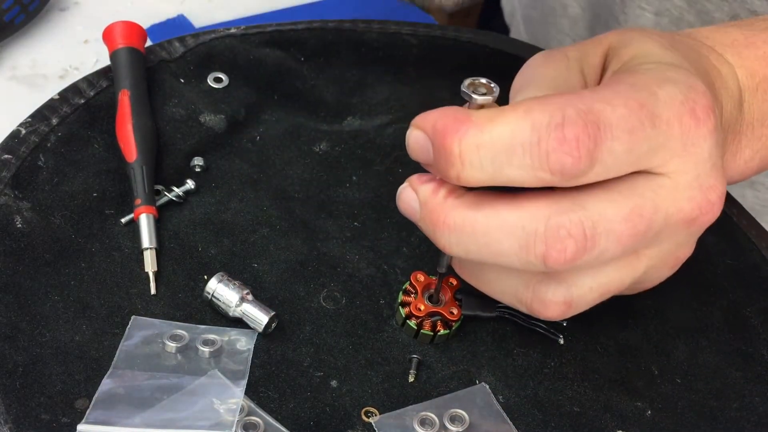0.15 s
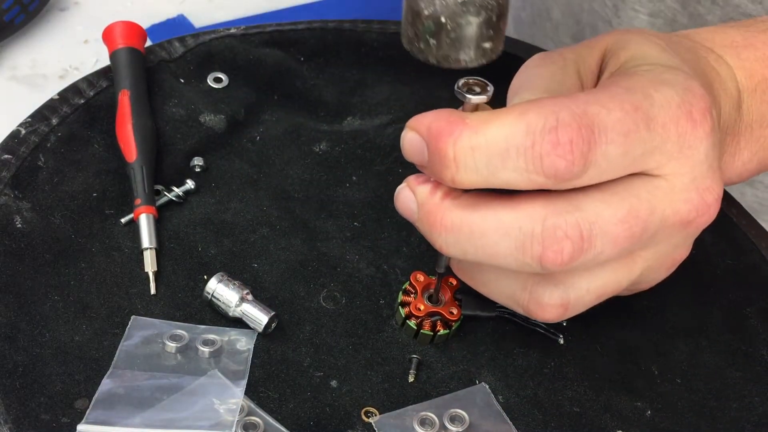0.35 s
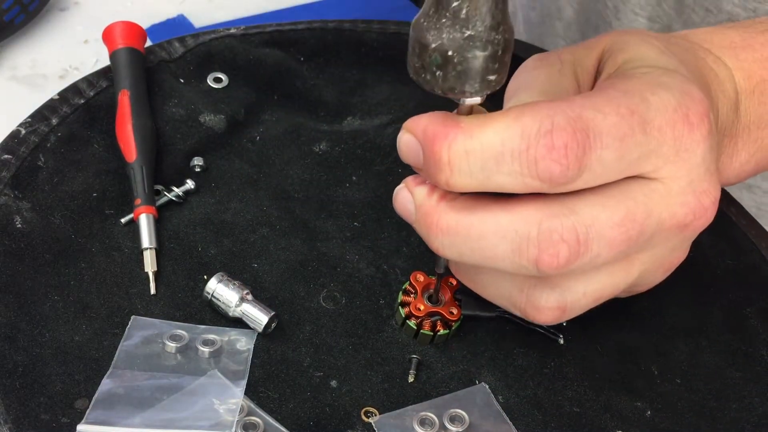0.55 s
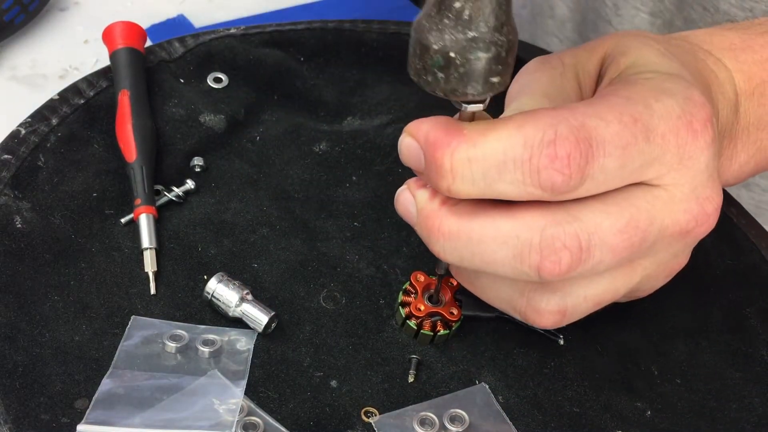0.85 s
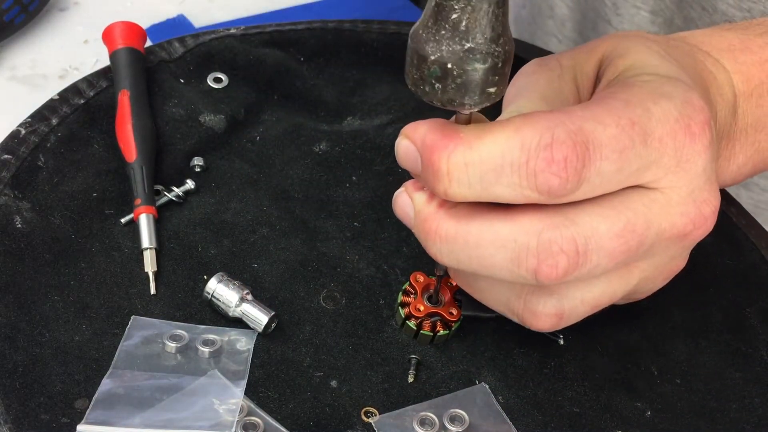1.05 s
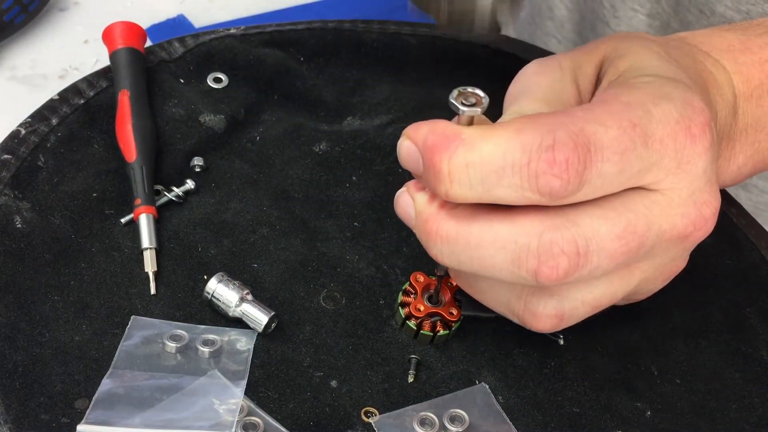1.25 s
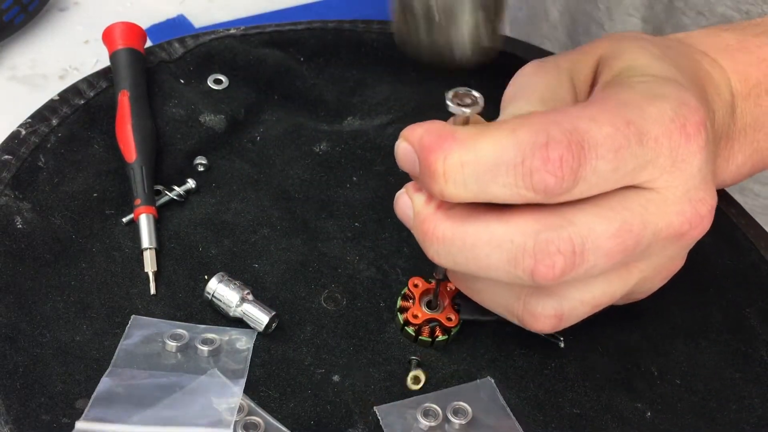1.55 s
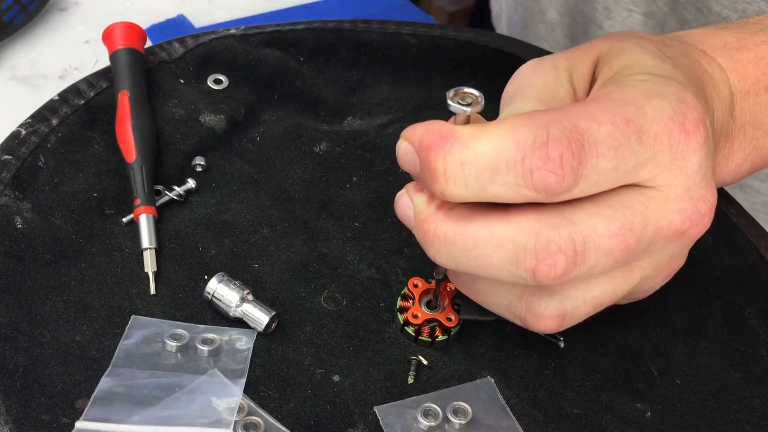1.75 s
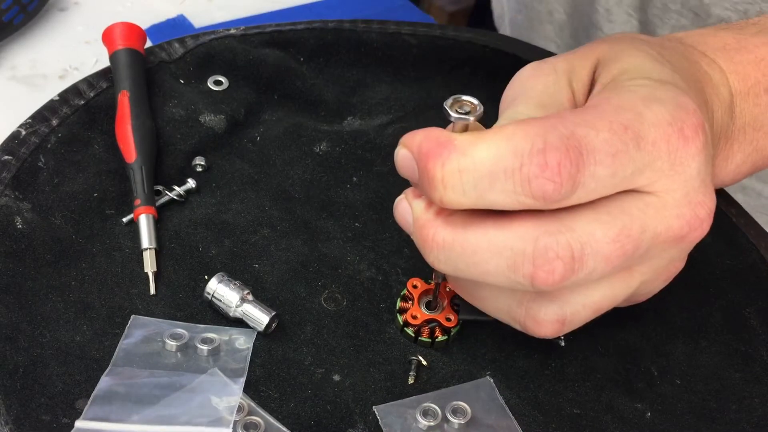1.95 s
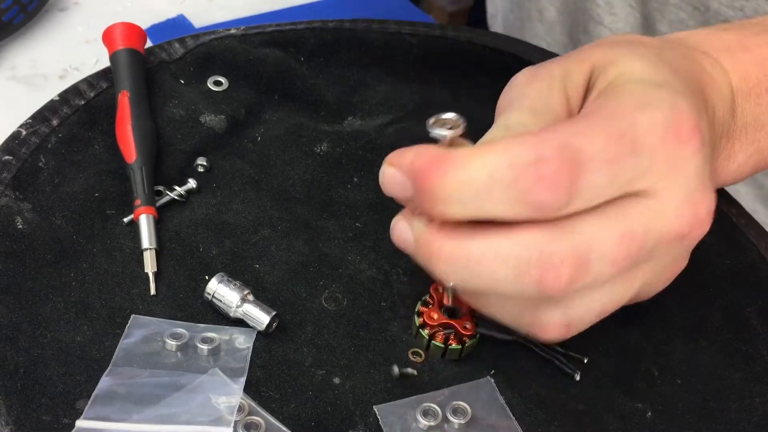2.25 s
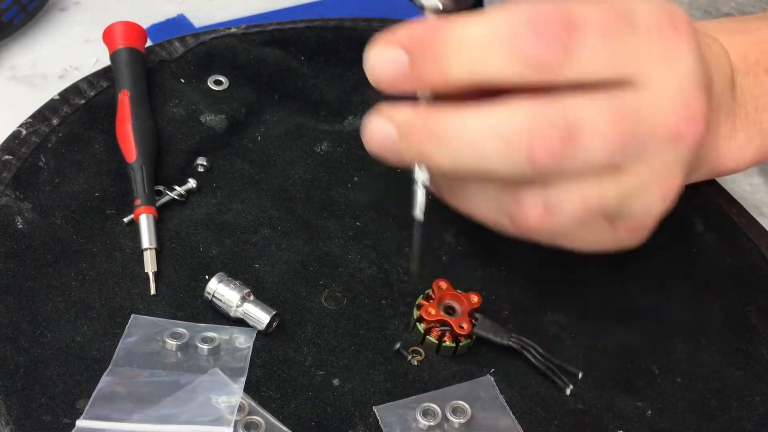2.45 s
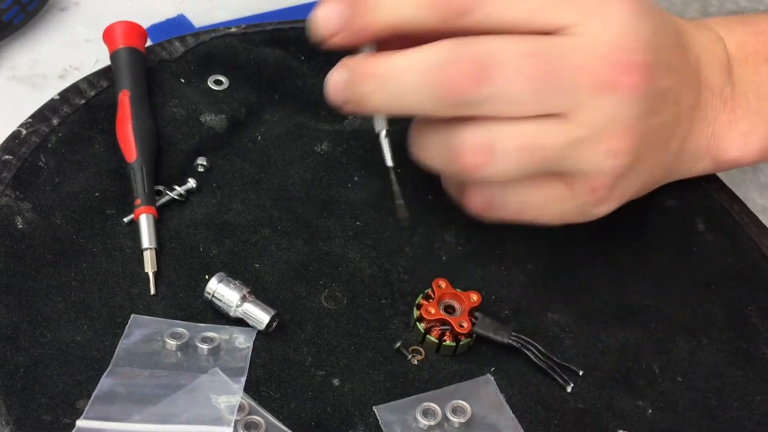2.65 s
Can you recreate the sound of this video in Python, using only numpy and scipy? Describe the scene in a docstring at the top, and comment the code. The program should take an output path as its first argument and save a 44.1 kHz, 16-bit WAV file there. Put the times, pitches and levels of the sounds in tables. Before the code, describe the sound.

Close, slightly clipped hammering on metal in a small workshop: quiet ticks first, three sharp loud hits at short even intervals, slight shuffling and washer tinkles, then the hammer set down with softer knocks over low hum.

```python
"""A hammer taps, then strikes a small screwdriver held on a motor bearing on a thin bench, and is set down.
Each contact sums a steel crack of short high modes, bench modes spread by a bending wave (treble first),
a rattle of dense jolts and the ringing hammer head, with a small room behind all but the ring.
Small metal ticks lie around the blows; a dull rubbing and washer jingles follow the last one.
Filtered-noise air and an appliance hum lie underneath; the recorder ducks and clips.
The hammer being set down makes softer contacts that have no crack."""
import sys
import numpy as np
from scipy import signal
from scipy.fft import rfft, irfft
from scipy.io import wavfile
from scipy.ndimage import uniform_filter1d

SR = 44100
rng = np.random.default_rng(int(sys.argv[2]) if len(sys.argv) > 2 else 0)


def pcm_store(signal):
    """Save signal as 16-bit PCM."""
    levels = np.round(np.clip(np.atleast_2d(signal), -1, 1) * 32767)
    wavfile.write(sys.argv[1], SR, levels.astype(np.int16).T)


def invert_db(x):
    """Field ratio 10**(x/20) for x, a level in decibels (scalar or array-like)."""
    u = np.asarray(x, float) / 20
    return 10 ** u


N = 123479


def evened(x):
    """Scales a signal to an rms of one."""
    return x / np.sqrt(np.mean(x ** 2) + 1e-20)


def read(f, value, hz):
    """Reads a curve between its points along a logarithmic frequency axis."""
    return np.interp(np.log(hz + 1), np.log(np.asarray(f) + 1), value)


def add(mix, s, sound):
    """Lays a sound into the mix at s seconds, cut off at the end of the mix."""
    part = mix[round(s * SR):][:len(sound)]
    part += sound[:len(part)]


def shaped_noise(curve):
    """Steady noise of rms one whose spectrum follows a curve of levels."""
    hz = np.fft.rfftfreq(N, 1 / SR)
    spectrum = rfft(rng.standard_normal(N))
    return evened(irfft(spectrum * invert_db(read(*np.transpose(curve), hz)), N))


def ring(modes, length, colour_db=0, rise_cycles=.01):
    """Decaying sines, each a little detuned and louder or softer by chance."""
    scatter_db, detune_share = 2, .006  # standard deviations
    hz, db, t60 = np.transpose(modes)
    t = np.arange(0, length, 1 / SR)[:, None]
    luck = rng.standard_normal((len(hz), 2))
    level = invert_db(db + colour_db + scatter_db * luck[:, 0] - 60 * t / t60)
    rise = 1 - np.exp(-(t * hz / rise_cycles) ** 2)
    pitch = hz * (1 + detune_share * luck[:, 1])
    return (level * rise * np.sin(2 * np.pi * pitch * t)).sum(1)


def air():
    """Room air: steady noise, heaviest in the bass."""
    # Spectrum of the air: f/Hz, relative level per Hz/dB
    air_curve = [(25, -24), (50, -6.5), (110, 2), (200, -10), (330, -8.5), (400, -23), (600, -21),
                 (1000, -27.5), (3000, -37), (8000, -46), (15000, -51.5), (16500, -81)]
    return invert_db(-52) * shaped_noise(air_curve)


def hum():
    """An appliance hums: narrow noisy bands and one tone wavering in strength."""
    # Noisy hum bands: f/Hz, width/Hz, level/dB
    hum_bands = [(58.7, 8, -61.5), (82.7, 2, -57.5), (117.6, 13, -52.5), (161.8, 3.1, -54),
                 (265.3, 25, -69), (304, 18, -72), (567, 17, -69.5), (895, 20, -80.5)]
    # Slow level changes of the bands under 200 Hz: t/s, level/dB
    bass_level = [(0, 0), (.5, -1), (.98, -3.5), (1.15, 0), (1.5, -1), (2.0, -5.5), (2.4, -9), (2.8, -3.5)]
    tone_hz, tone_db, waver_depth, waver_s = 263.3, -51, 0.21, 0.038
    hz, t = np.fft.rfftfreq(N, 1 / SR), np.arange(N) / SR
    out = np.zeros(N)
    for f, width, db in hum_bands:
        noise = rfft(rng.standard_normal(N))
        level_db = db + (f < 200) * np.interp(t, *np.transpose(bass_level))
        out += invert_db(level_db) * evened(irfft(noise / (1 + (2 * (hz - f) / width) ** 2), N))
    waver = evened(uniform_filter1d(rng.standard_normal(N), int(waver_s * SR)))
    tone = evened(np.sin(2 * np.pi * tone_hz * t))
    return out + invert_db(tone_db) * (1 + waver_depth * waver) * tone


def crack(db):
    """Steel on steel: a few milliseconds of very high modes and a puff of bright noise."""
    # Short modes of the struck steel: f/Hz, relative level/dB, t60/s
    crack_modes = [(2600, -12, .003), (3600, -10, .003), (5000, -9, .003), (6200, -5, .004),
                   (7400, -7, .003), (8700, -6, .004), (10000, -7, .004), (11650, -2, .006),
                   (13900, -1, .005), (15500, -19, .04)]
    puff_db, puff_t60_s = -4, .005  # level beside the modes
    t = np.arange(0, .04, 1 / SR)
    bright_noise = np.diff(rng.standard_normal(len(t) + 1))
    puff = invert_db(puff_db - 60 * t / puff_t60_s) * bright_noise
    onset = np.minimum(t / 0.0001, 1)
    return invert_db(db - 6.5) * (ring(crack_modes, .04) + puff) * onset


def room(x):
    """Adds a small room: noise in overlapping bands, each dying at its own speed."""
    # Bands of the room tail: f/Hz, t60/s, relative level/dB
    room_bands = [(60, 0.29, -13.5), (126, 0.16, -0.5), (198, 0.067, -17), (278, .28, -1), (545, 0.37, -7),
                  (1044, 0.35, -5.5), (2900, 0.32, -9), (7140, 0.25, -12.5), (13210, 0.053, -21)]
    rise_s = .004
    t, hz = np.arange(len(x)) / SR, np.fft.rfftfreq(len(x), 1 / SR)
    noise = rfft(rng.standard_normal(len(x)))
    centres = [row[0] for row in room_bands]
    tail = 0
    for share, (_, t60, db) in zip(np.eye(len(room_bands)), room_bands):
        fall = invert_db(-60 * t / t60) * (1 - np.exp(-t / rise_s))
        band = irfft(noise * read(centres, share, hz), len(x))
        tail = tail + invert_db(db) * fall / np.linalg.norm(fall) * band
    return x + signal.fftconvolve(x, tail)[:len(x)]


def bend(x):
    """Dispersion in the bench top: the lower the frequency, the later it comes."""
    delay_s_root_hz = .07  # the delay is this over the root of the frequency
    size = 2 * len(x)
    hz = np.fft.rfftfreq(size, 1 / SR)
    phase = -4 * np.pi * delay_s_root_hz * np.sqrt(hz)
    return irfft(rfft(x, size) * np.exp(1j * phase), size)[:len(x)]


def bench(at_hz, db):
    """Bench modes, coloured by where the blow lands, behind the bending delay."""
    # Modes of the bench: f/Hz, relative level/dB, t60/s
    bench_modes = [(61.1, -14, 0.39), (74.5, -1.5, .1), (90, 0, 0.12), (126.5, 5.5, .12),
                   (265.4, -2.5, 0.24), (315.1, -4, 0.19), (393.2, -7, 0.12), (423.3, -8, 0.15),
                   (492.4, 5.5, 0.035), (535, -1, 0.098), (626.9, 10.5, 0.027), (687, -6, 0.027),
                   (755, -8.5, 0.046), (878.5, -2.5, 0.09), (1121, 4.5, 0.023), (1235, -7, 0.053),
                   (1324, -7, .03), (1585, 6.5, 0.0081), (1850, 8.5, 0.0067), (1990, -6.5, 0.022),
                   (2213, -5.5, 0.015), (2378, -5.5, 0.045), (2650, 1, 0.017), (2950, 0, .015),
                   (3297, 4.5, 0.0055), (3700, 1.5, 0.0037), (4800, -11, .006)]
    colour_db = read(at_hz, db, np.transpose(bench_modes)[0]) - 14
    return bend(ring(bench_modes, .6, colour_db, rise_cycles=0.28))


def rattle(db, top_hz):
    """Dense fine jolts of loose parts, dying away."""
    jolts_per_s, t60_s, rise_s, low_hz = 8000, .2, .006, 900
    t = np.arange(0, .6, 1 / SR)
    hits = rng.random(len(t)) < jolts_per_s / SR
    band = signal.butter(1, [low_hz, top_hz], "band", fs=SR)
    jolts = signal.lfilter(*band, hits * rng.standard_normal(len(t)))
    return evened(jolts) * invert_db(db - 60 * t / t60_s) * (1 - np.exp(-t / rise_s))


def hammer(db, upper_db=0):
    """The hammer head rings; contact makes each mode wobble in strength."""
    # Modes of the hammer head: f/Hz, relative level/dB, t60/s
    hammer_modes = [(4540, -5, .4), (6090, -12, .25), (7768, -12, .3), (9555, -15, .2), (10870, -13, .3),
                    (11710, -10, .18), (12760, -18, .15), (13620, -14, .1), (14480, -9, .07),
                    (15480, -20, .1)]
    wobble_depth, wobble_s, rise_s = .9, .008, 0.0013
    t = np.arange(0, .6, 1 / SR)[:, None]
    hz, mode_db, t60 = np.transpose(hammer_modes)
    noise = rng.standard_normal((len(t), len(hz)))
    # the root brings the smoothed noise back to an rms near one
    wobble = uniform_filter1d(noise, int(wobble_s * SR), axis=0) * np.sqrt(wobble_s * SR)
    level = invert_db(db + mode_db + upper_db * (hz > hz[0]) - 60 * t / t60)
    level = level * (1 + wobble_depth * wobble) * (1 - np.exp(-t / rise_s))
    return (level * np.sin(2 * np.pi * hz * t)).sum(1)


def blow(crack_db, rattle_db, ring_db, *bench_db):
    """A tick, tap or hard blow: crack, bench and rattle in the room, and the ring of the held hammer."""
    # Where the bench colour is set: f/Hz
    colour_hz = (60, 125, 300, 550, 1000, 1700, 3000)
    out = bench(colour_hz, bench_db) + rattle(rattle_db, top_hz=5000)
    add(out, 0, crack(crack_db))
    # the upper hammer modes are weaker in the swinging hand
    return room(out) + hammer(ring_db, upper_db=-18)


def shuffle():
    """Fingers shift the motor over the bench: dull rubbing noise that swells and fades."""
    # Strength of the rubbing: t/s, level/dB
    rub_level = [(2.28, -70), (2.34, -50.5), (2.45, -57), (2.48, -87.5), (2.52, -60.5), (2.58, -65),
                 (2.661, -74.5), (2.695, -47.5), (2.72, -69.5)]
    # Spectrum of the rubbing: f/Hz, relative level per Hz/dB
    rub_curve = [(210, -45), (350, -8), (498, 3), (1520, -19), (4260, -33.5), (5230, -33.5), (9000, -38),
                 (11700, -75), (19800, -120)]
    s, db = np.transpose(rub_level)
    # silent before the first point and after the last
    return shaped_noise(rub_curve) * np.interp(np.arange(N) / SR, s, invert_db(db), 0, 0)


def jingle(db):
    """A washer jingles: a few high modes that die within hundredths of a second."""
    # Modes of the washer: f/Hz, relative level/dB, t60/s
    washer_modes = [(5240, -10.5, .03), (11380, -1.5, 0.024), (12400, -13, .01), (9740, -15.5, .008),
                    (13300, -14, 0.0086), (15000, -10.5, .01)]
    return invert_db(db) * ring(washer_modes, .08)


def rock(rattle_db, ring_db, *bench_db):
    """A soft contact: no crack, the bench with its treble rounded off, and the free hammer ringing."""
    # Where the bench colour of a contact is set: f/Hz
    colour_hz = (150, 310, 400, 600, 2000)
    soft_s = .0002  # time constant of the rounding
    keep = np.exp(-1 / (soft_s * SR))
    soft_bench = signal.lfilter([1 - keep], [1, -keep], bench(colour_hz, bench_db))
    # the rattle of a soft contact is darker
    return room(soft_bench + rattle(rattle_db, top_hz=2184)) + hammer(ring_db)


def scene():
    """Taps, blows, rocking, ticks and jingles over the air, the hum and the rubbing."""
    # Metal parts touch or rattle: t/s, level/dB
    tick_times = [(.8090, -31), (.8125, -51), (0.8128, -35), (0.836, -39), (.852, -54), (1.07, -21.5),
                  (1.096, -44), (1.118, -64), (1.5268, -8.5), (1.53, -21.5), (1.5415, -12), (1.5508, -13.5),
                  (1.566, -17.5), (1.863, -15.5), (1.8650, -15.5), (1.8730, -13), (1.8855, -29),
                  (2.1460, -19.5), (2.2, -26.5), (2.513, -59), (2.719, -46), (2.7205, -24)]
    # Taps, a faint tick and hammer blows: t/s, crack level/dB, rattle level/dB, hammer ring level/dB,
    # then bench level/dB at 60, 125, 300, 550, 1000, 1700, 3000 Hz
    blow_times = [(0.8169, -31, -79, -76, -32, -53, -60, -31, -25.5, -28.5, -27),
                  (1.0743, -14, -68, -68.5, -19.5, -24, -48.5, -19, -13.5, -18.5, -21),
                  (1.2192, -46, -80, -76.5, -70, -73, -67, -61, -58, -52.5, -42),
                  (1.5179, 1, -20.5, -41, 8, 5.5, -5, 3.5, -2, 8.5, -5.5),
                  (1.8520, 6.5, -23.5, -40.5, 3, -3, 1, 8.5, -2, 5, 1.5),
                  (2.1362, 3.5, -28, -45.5, -27.5, 0, -3.5, 5.5, 0, 6.5, 1),
                  (2.1410, -12.5, -37, -59, -28.5, -10, -9.5, 4, 3.5, -7, -6)]
    # A washer jingles: t/s, level/dB
    jingle_times = [(2.4, -44), (2.4400, -63), (2.4550, -52), (2.4600, -52.5), (2.465, -54), (2.471, -49),
                    (2.4820, -64), (2.502, -74)]
    # The hammer is laid down and rocks: t/s, rattle level/dB, hammer ring level/dB,
    # then bench level/dB at 150, 310, 400, 600, 2000 Hz
    rock_times = [(2.7020, -31.5, -71.5, -39.5, -3, -4, -5, -15.5),
                  (2.7122, -59.5, -37.5, -28.5, 9, -20.5, 2, -28),
                  (2.7160, -38, -66, -18, -15, 15, 4.5, 5.5), (2.7225, -44, -34.5, -28.5, 10, -1.5, 5.5, 1),
                  (2.7420, -58.5, -60, -43, -17, -30, -6.5, -0.5),
                  (2.764, -37, -67, -39, -5.5, -3, -12, -5), (2.7900, -53, -63, -34, -9, -9.5, -25, -13)]
    mix = air() + hum() + shuffle()
    small = np.zeros(N)
    for s, db in tick_times:
        add(small, s, crack(db))
    for s, *levels in blow_times:
        add(mix, s, blow(*levels))
    for s, db in jingle_times:
        add(small, s, jingle(db))
    for s, *levels in rock_times:
        add(mix, s, rock(*levels))
    return (mix + room(small))[None]


def duck(dry):
    """Gain control: turns down by a share of the excess level, held by a slowly falling detector."""
    from_db, share, detector_fall_db_per_s, gain_db = -11, 0.1, 70, 1.5
    power_db = 10 * np.log10(abs(uniform_filter1d(dry[0] ** 2, size=300)) + 1e-12)
    fall = np.arange(N) * detector_fall_db_per_s / SR
    held_db = np.maximum.accumulate(power_db + fall) - fall
    over_db = np.maximum(held_db - from_db, 0)
    over_db = signal.lfilter([.005], [1, -.995], over_db)  # smooth the gain moves
    return dry * invert_db(gain_db - share * over_db)


def top_cut(x):
    """Nothing passes above the cut-off."""
    return signal.sosfilt(signal.butter(12, 16700, fs=SR, output="sos"), x)


def record(dry):
    """The recorder ducks after loud blows and recovers; the band is limited and peaks clip."""
    x = duck(dry)
    x = signal.sosfilt(signal.butter(4, 51, "high", fs=SR, output="sos"), x)
    treble_limit = signal.firwin(255, 15900, window=("kaiser", 9), fs=SR)
    x = signal.oaconvolve(x, treble_limit[None], "same")
    return top_cut(np.clip(x, -1, 1))


dry = scene()
out = record(dry)
pcm_store(out)
```